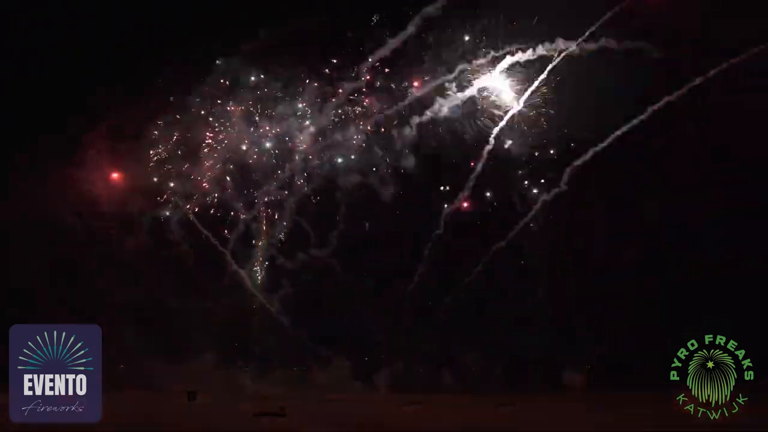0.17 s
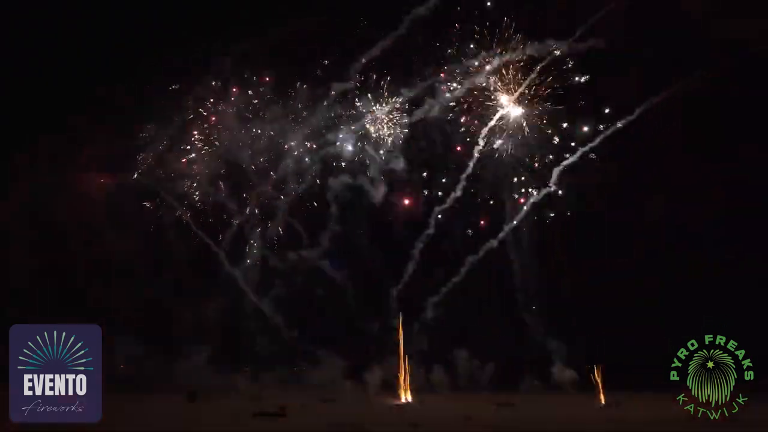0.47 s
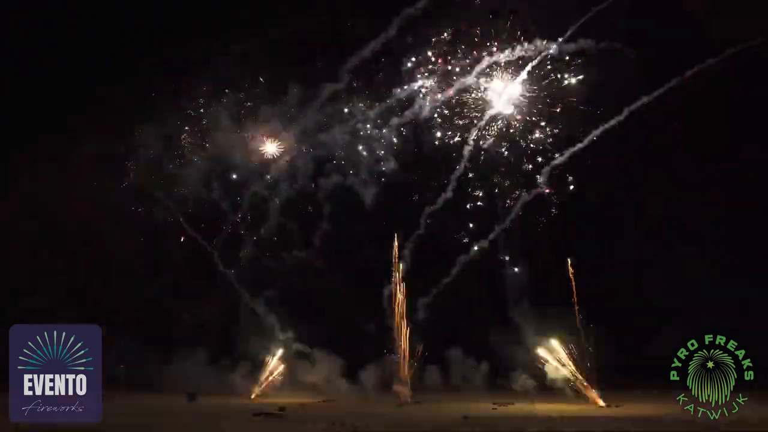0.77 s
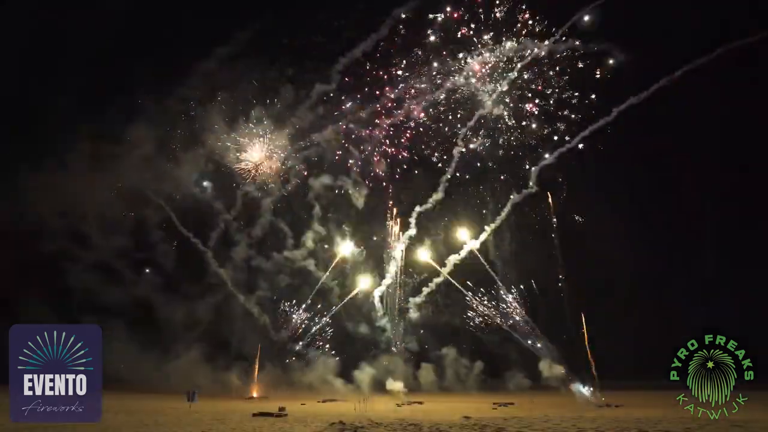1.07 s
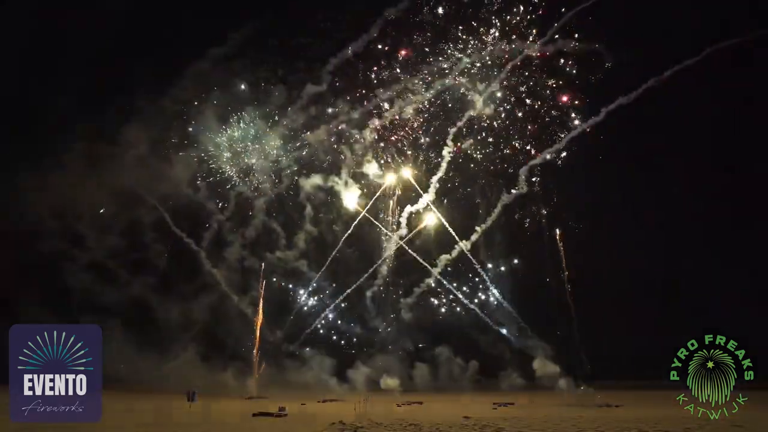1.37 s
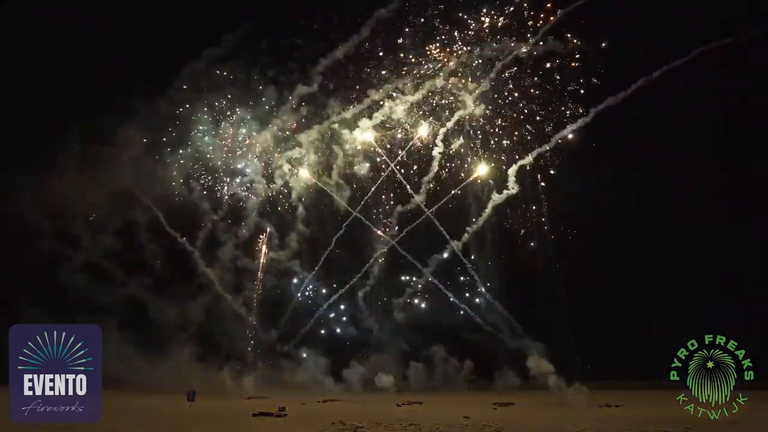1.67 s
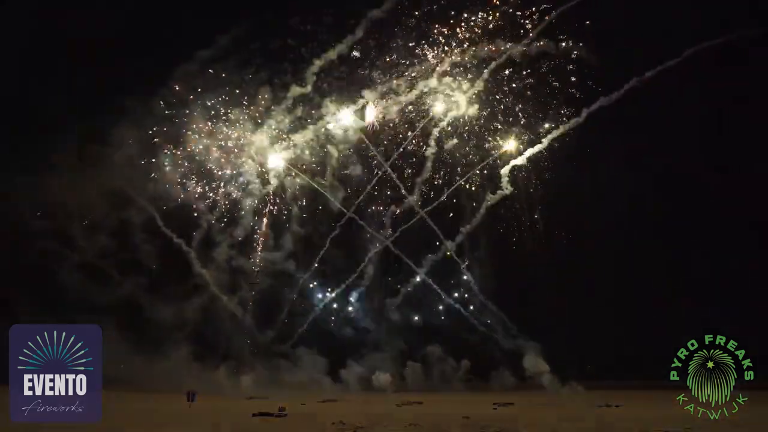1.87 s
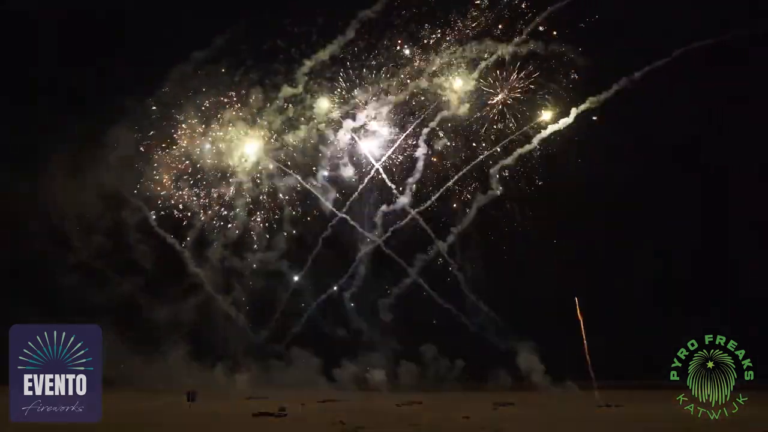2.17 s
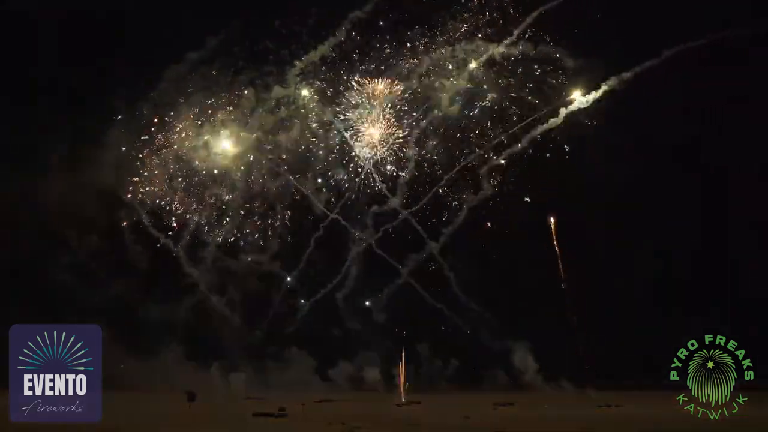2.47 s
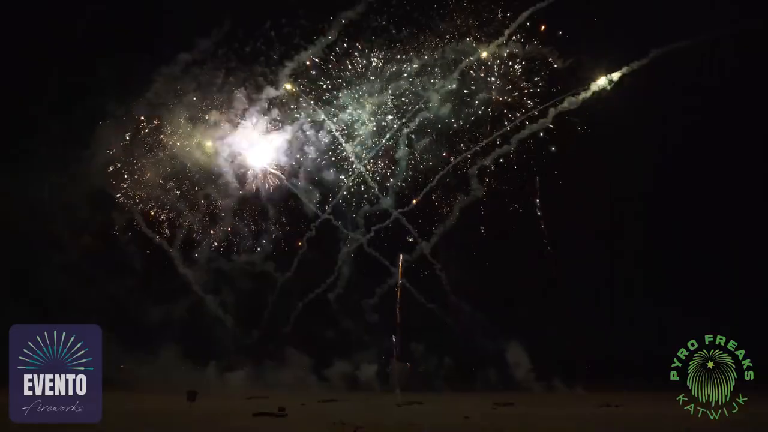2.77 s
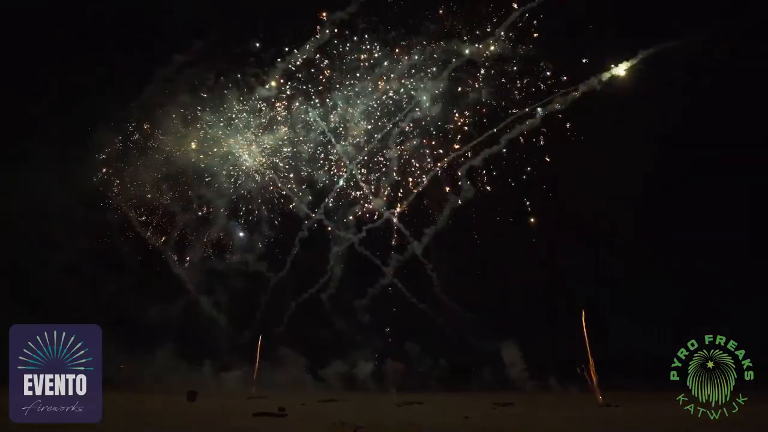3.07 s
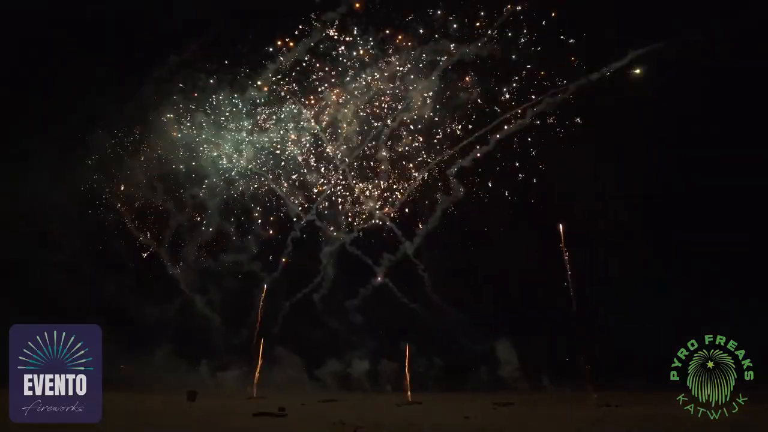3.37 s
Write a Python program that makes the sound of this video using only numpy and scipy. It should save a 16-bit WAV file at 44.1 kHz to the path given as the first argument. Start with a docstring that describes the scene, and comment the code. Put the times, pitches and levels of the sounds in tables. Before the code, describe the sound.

Firework shells crack in rapid uneven volleys over open ground at night, clipped and dry

```python
"""Firework batteries on open ground at night: shells burst overhead as sharp pressure jumps, each mirrored by the ground
a few ms later; tubes thump and spit at launch; scattered echoes roll after. A mid-side camera microphone, with a faint
beating electrical whine, picks it up and clips the tallest peaks."""
import sys
import numpy as np
from scipy import signal
from scipy.fft import rfft, irfft
from scipy.io import wavfile

SR = 44100
rng = np.random.default_rng(int(sys.argv[2]) if len(sys.argv) > 2 else 0)


def dump(signal):
    """Clip the signal to [-1, 1] and save it as 16-bit WAV at the path in sys.argv[1]."""
    limited = np.clip(np.atleast_2d(signal).T, -1, 1)
    pcm = np.round(limited * 32767).astype(np.int16)
    wavfile.write(sys.argv[1], SR, pcm)


N = 156555

# shell bursts (s, peak dB, side share -1 left to 1 right, ground echo lag ms, relative length)
BURSTS = [(0.2446, -4.1, 1.04, 7.6, 0.98), (0.276, -4.8, 1.09, 7.19, 0.96), (0.4972, -3.1, 0.96, 7.48, 0.98),
          (0.5018, -4.2, 0.96, 7.66, 1.1), (0.5438, -5.3, 0.19, 7.2, 1.04), (0.5493, -3.3, 0.97, 7.41, 0.96),
          (0.5806, -6.5, 0.15, 7.39, 0.96), (0.6437, -3.2, 1.12, 7.1, 0.94), (0.7848, -3.9, 0.94, 7.37, 1.0),
          (0.8015, -4.8, 1.01, 7.14, 1.04), (0.8818, -5.4, 0.97, 7.6, 0.94), (1.0599, -4.7, 0.98, 7.6, 0.94),
          (1.0942, -5.4, 1.06, 7.55, 0.98), (1.1062, -5.0, -0.6, 6.39, 1.02), (1.2121, -5.0, -0.59, 6.3, 0.98),
          (1.2558, -7.4, -0.7, 6.42, 0.94), (1.2599, -6.2, -0.48, 5.67, 0.98), (1.2887, -4.6, -0.55, 6.12, 0.98),
          (1.3438, -5.1, -0.69, 6.08, 1.0), (1.4938, -5.4, -0.68, 6.05, 0.98), (2.1632, -2.7, 0.14, 7.39, 0.96),
          (2.2554, -3.8, 0.17, 6.92, 0.98), (2.2893, -5.4, 0.17, 6.76, 1.1), (2.3111, -3.1, 0.17, 7.41, 0.94),
          (2.3264, -4.0, 0.88, 7.44, 0.92), (2.482, -3.9, 0.15, 7.21, 1.04), (2.496, -4.3, 0.11, 6.83, 0.98),
          (2.5216, -4.8, 0.21, 7.1, 0.96), (2.548, -3.5, 0.18, 7.39, 1.0), (2.6009, -4.9, 0.23, 7.19, 0.96),
          (2.6602, -5.5, 0.19, 7.57, 1.1), (2.6652, -3.6, 0.15, 7.12, 1.08), (2.7104, -5.1, 0.24, 6.87, 0.96),
          (2.8332, -4.1, 1.0, 7.48, 0.96), (2.8773, -4.5, -0.53, 6.35, 1.06), (2.9002, -5.1, -0.55, 6.44, 1.12),
          (3.0009, -5.1, -0.63, 6.08, 1.06), (3.0184, -4.8, -0.73, 6.15, 1.04), (3.0724, -6.4, -0.66, 6.64, 1.04),
          (3.1313, -4.1, -0.63, 6.26, 1.04), (3.2516, -6.2, -0.64, 6.39, 1.0)]  # fixed
# launches (s, thump dB, side share, time to the trough ms, click dB)
LAUNCHES = [(0.6189, -28.4, 0.17, 2.1, -25.2), (0.6754, -31.7, -0.21, 2.0, -31.5),
            (0.6913, -29.6, 0.12, 2.1, -26.6), (0.7072, -31.5, 1.19, 1.5, -14.7), (0.7274, -31.4, 0.6, 1.9, -35.6),
            (0.7471, -30.9, 0.42, 1.9, -24.6), (0.7672, -29.4, 0.16, 2.1, -26.5), (0.8526, -30.9, 0.37, 1.9, -25.9),
            (0.8584, -31.4, -0.33, 1.9, -29.8), (0.9132, -29.5, 0.77, 2.2, -23.6), (0.9686, -25.5, 1.54, 2.2, -9.0),
            (0.971, -25.4, 1.55, 2.2, -10.3), (1.0123, -26.7, -0.6, 1.7, -14.0), (1.021, -25.7, -0.81, 2.4, -15.6),
            (1.1686, -30.6, 1.46, 1.8, -21.6), (1.3282, -34.3, -0.47, 1.5, -22.0),
            (1.3698, -35.0, -0.41, 2.6, -32.2), (1.4102, -34.9, -0.63, 1.8, -30.8),
            (1.4404, -33.9, -0.8, 1.9, -23.8), (1.448, -31.4, -0.51, 2.2, -24.0), (1.4789, -32.3, -0.7, 2.0, -21.2),
            (2.234, -30.9, 1.66, 1.6, -19.9), (3.1799, -29.6, 1.3, 1.6, -25.6), (3.5413, -31.9, 0.42, 1.9, -22.9)]  # fixed
GROUND_DB, GROUND_HZ = -6.5, 2580
# the side signal's spike ahead of a front
PORT_MS, PORT_DB, PORT_GROUND_DB = .055, -2.5, -1.5  # fixed
RING_HZ, RING_WIDTH_HZ, RING_DB = 6200, 7000, -14  # housing rattle after a front; fixed
RING_MS = .65  # fixed
# echoes (start ms, level dB, t60 s, top Hz, mid against side dB)
ECHOES = [(1.5, -27, 0.031, 15000, -2.5), (8, -37.5, 0.26, 9000, -12.5), (25, -52, 1.28, 6600, -11)]
NIGHT = [(24, -39.5), (40, -9), (328, -5), (712, -7.5), (886, -13.5), (1470, -11.5), (2630, -21.5), (3190, -23.5), (13000, -35.5)]  # (Hz, dB per Hz)
NIGHT_DB, NIGHT_MID_DB, EARLIER_DB, EARLIER_T60_S = -58.5, -10, 12, 0.46
BASS_HZ, MID_TAIL_HZ, GAIN_DB = 160, 5000, 3.14
TOP_HZ = 16600  # fixed
FALL_MS, SUCTION, RETURN_MS = 1.0, 0.18, 1  # burst: jump, fall, return
THUMP_DB, THUMP_TURNS, THUMP_HZ = 1, 1.4, 1190
SPIT_MS, SPIT_DB, SPIT_MID_DB = 2.94, -20.5, -4
CLICK_MS = .045  # fixed
SIZZLE_LAUNCH_DB, SIZZLE_HZ, SIZZLE_PATCH_DB = 4, 1500, 1.5
SIZZLE_MID_DB = -14  # fixed
HUM_HZ, HUM_WIDTH_HZ, HUM_DB = 820, 33, -67
WHINE_HZ, BEAT_HZ, BEAT_NULL_S = 15735, 13.2, 1.803  # fixed
WHINE_DB, BEAT_DEPTH = -61.5, 0.65
# deep booms of the heavier tubes (s, dB, side share, Hz)
BOOMS = [(0.974, -28, 1.6, 115), (1.016, -25, -.7, 120), (1.024, -33, -.8, 86)]
BOOM_T60_S = 0.043
BURST_DB, MID_FRONT_HZ, RING_GROUND_DB = -1.65, 9700, -4.5
CLICK_HZ, SPIT_LEAD_MS = 1800, 1.3  # fixed
# (dB, t60 s)
SIZZLE = [(-50, .12), (-62, .7)]  # fixed


def undb(db):
    return 10 ** (np.asarray(db) / 20)


def filt(x, hz, kind, order=2):
    """Butterworth filter along time."""
    return signal.sosfilt(signal.butter(order, hz, kind, fs=SR, output="sos"), x)


def add(out, x, s):
    """Mix x in at time s."""
    i = int(round(s * SR))
    n = min(x.shape[-1], N - i)
    out[..., i:i + n] += x[..., :n]


def nwave(fall_ms, return_ms, size):
    """Pressure jumps to 1, falls straight into suction, eases back."""
    ms = np.arange(size) / SR * 1000
    back = np.clip((ms - fall_ms) / return_ms, 0, 1)
    return np.where(ms < fall_ms, 1 - (1 + SUCTION) * ms / fall_ms, -SUCTION * (1 + np.cos(np.pi * back)) / 2)


def ring(ms, size):
    """A short burst of treble noise."""
    edges = [max(RING_HZ - RING_WIDTH_HZ / 2, 500), RING_HZ + RING_WIDTH_HZ / 2]
    x = filt(rng.standard_normal(size), edges, "band", order=1)
    return x / x.std() * np.exp(-np.arange(size) / SR * 1000 / ms)


def late(x, ms):
    """Delay by a fraction of samples."""
    k = np.arange(len(x))
    return np.interp(k - ms * SR / 1000, k, x, left=0)


def bursts():
    """Each burst straight from the sky, then duller from the ground; mid and side."""
    out, size = np.zeros((2, N)), 700
    for s, db, side, lag_ms, scale in BURSTS:
        wave = nwave(FALL_MS * scale, RETURN_MS * scale, size)
        dull = undb(GROUND_DB) * filt(wave, GROUND_HZ, "low")
        paths = (wave, undb(PORT_DB), RING_DB, 0), (dull, -undb(PORT_GROUND_DB) * 2, RING_GROUND_DB, lag_ms)
        for p, port, ring_db, ms in paths:
            mid = filt(late(p, PORT_MS), MID_FRONT_HZ, "low")
            rattle = undb(ring_db) * p.max() * ring(RING_MS, size)
            both = np.array([mid, side * mid + port * (p - late(p, PORT_MS)) + rattle])
            add(out, undb(db + BURST_DB) * both, s + ms / 1000)
    return out


def launches():
    """A soft swinging thump from the tube, a click amid a spit of gas."""
    out, size, lead = np.zeros((2, N)), 900, 200  # fixed
    ms = (np.arange(size) - lead) / SR * 1000
    after = np.maximum(ms, 0)
    click = filt(np.exp(-(ms / CLICK_MS) ** 2), CLICK_HZ, "high")
    gas = np.where(ms < 0, np.exp(np.minimum(ms, 0) / SPIT_LEAD_MS) / 2, np.exp(-after / SPIT_MS))
    for s, thump_db, side, trough_ms, click_db in LAUNCHES:
        swing = (ms >= 0) * np.cos(np.pi * ms / trough_ms) * np.exp(-after / trough_ms / THUMP_TURNS)
        thump = undb(thump_db + THUMP_DB) * filt(swing, THUMP_HZ, "low")
        spit = [undb(click_db) * (click + undb(SPIT_DB) * gas * ring(np.inf, size)) for _ in range(2)]
        both = np.array([thump + undb(SPIT_MID_DB) * spit[0], side * thump + np.sign(side) * spit[1]])
        add(out, both, s - lead / SR)
    return out


def echoes():
    """Every burst returns as a fresh spray of small copies from all around, mostly in the side signal."""
    out = 0
    wave = nwave(FALL_MS, RETURN_MS, size=128)
    for start_ms, db, t60, top_hz, mid_db in ECHOES:
        spray, t = np.zeros((2, N)), np.arange(SR) / SR
        t = t[:int(min(t60, 1) * SR)]
        fade = undb(db - 60 * t / t60) * (1 - np.exp(-t * 1000 / start_ms))
        for s, burst_db, _, lag_ms, _ in BURSTS:
            add(spray, undb(burst_db) * fade * rng.standard_normal((2, SR))[:, :len(t)], s + lag_ms / 1000)
        spray = filt(signal.fftconvolve(spray, wave[None] , axes=1)[:, :N], top_hz, "low", order=1)
        out = out + spray * undb([[mid_db], [0]])
    return out


def night():
    """Wide rumble of the open air, at first still carrying the roll of earlier bursts."""
    f = np.maximum(np.arange(N // 2 + 1) * SR / N, 1)
    hz, db = np.array(NIGHT).T
    x = irfft(rfft(rng.standard_normal((2, N))) * undb(np.interp(np.log(f), np.log(hz), db)), N)
    t = np.arange(N) / SR
    return x / x.std() * undb([[NIGHT_DB + NIGHT_MID_DB], [NIGHT_DB]]) * (1 + undb(EARLIER_DB - 60 * t / EARLIER_T60_S))


def whine():
    """Two close high tones that beat."""
    t = np.arange(N) / SR
    turn = np.pi * BEAT_HZ * (t - BEAT_NULL_S)
    base = 2 * np.pi * WHINE_HZ * t
    return undb(WHINE_DB) * (np.sin(base + turn) - BEAT_DEPTH * np.sin(base - turn))


def sizzle():
    """The sharp edges of the returning echoes: a patchy treble wash after bursts and launches."""
    out, t = np.zeros((2, N)), np.arange(SR // 2) / SR
    shape = sum(undb(db - 60 * t / t60) for db, t60 in SIZZLE)
    starts = [(b[0] + b[3] / 1000, b[1]) for b in BURSTS] + [(a[0], a[4] + SIZZLE_LAUNCH_DB) for a in LAUNCHES]
    for s, db in starts:
        patch = undb(SIZZLE_PATCH_DB * np.repeat(rng.standard_normal(len(t) // 128 + 1), 128)[:len(t)])
        fade = undb(db) * shape * patch
        add(out, fade * rng.standard_normal((2, len(t))), s)
    return filt(out, [SIZZLE_HZ, 11000], "band", order=1) * undb([[SIZZLE_MID_DB], [0]])


def hum():
    """A faint wavering tone in the background."""
    x = filt(rng.standard_normal((2, N)), [HUM_HZ - HUM_WIDTH_HZ / 2, HUM_HZ + HUM_WIDTH_HZ / 2], "band")
    return x / x.std() * undb([[HUM_DB + NIGHT_MID_DB], [HUM_DB]])


def booms():
    """A few slow swings of air."""
    out, t = np.zeros((2, N)), np.arange(SR // 10) / SR
    for s, db, side, hz in BOOMS:
        add(out, undb(db - 60 * t / BOOM_T60_S) * np.sin(2 * np.pi * hz * t) * np.array([[1], [side]]), s)
    return out


def scene():
    far = echoes() + sizzle()
    far[0] = filt(far[0], MID_TAIL_HZ, "low", order=4)
    air = night() + hum()
    air[0] = filt(air[0], MID_TAIL_HZ, "low", order=4)
    mid, side = filt(bursts() + launches() + far, BASS_HZ, "high") + filt(booms(), 55, "high") + air
    return np.array([mid - side, mid + side]) + whine()


def record(dry):
    """The tallest peaks clip; the top is cut."""
    cut = signal.ellip(10, .2, 95, TOP_HZ, fs=SR, output="sos")  # fixed
    return signal.sosfilt(cut, np.clip(undb(GAIN_DB) * dry, -.92, .92))


dry = scene()
out = record(dry)
dump(out)
```